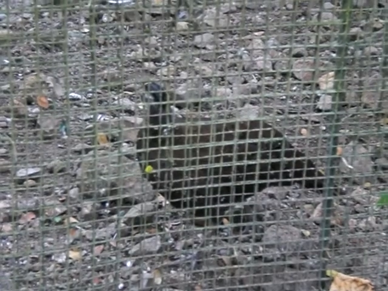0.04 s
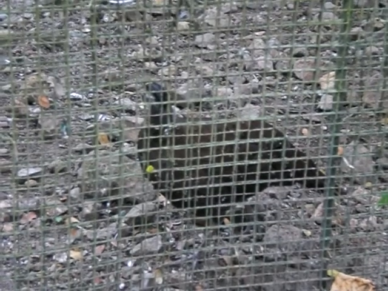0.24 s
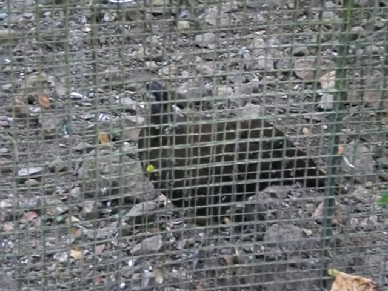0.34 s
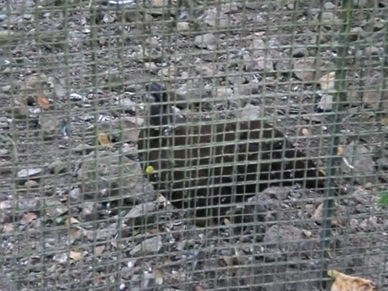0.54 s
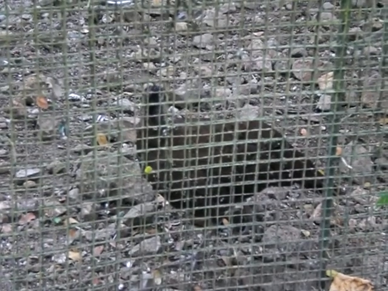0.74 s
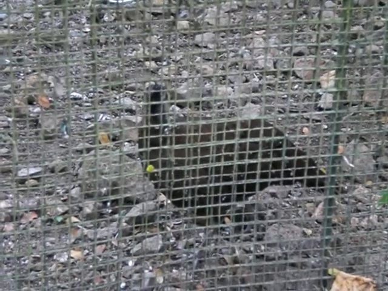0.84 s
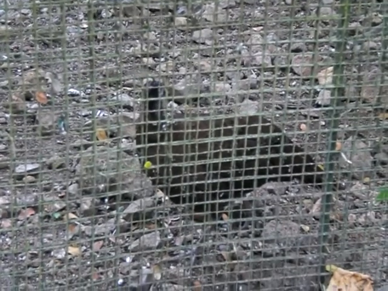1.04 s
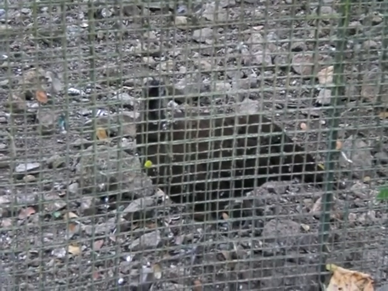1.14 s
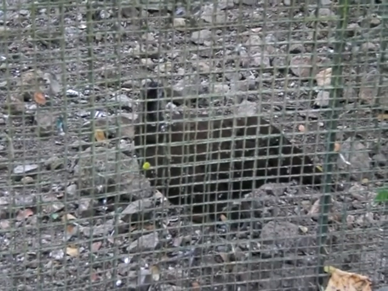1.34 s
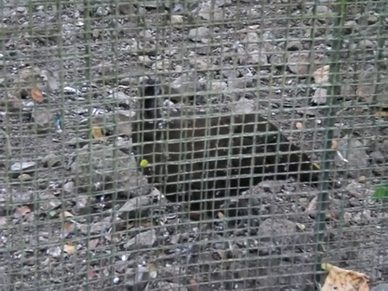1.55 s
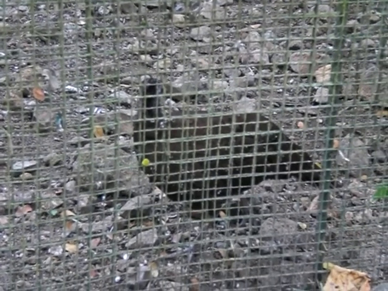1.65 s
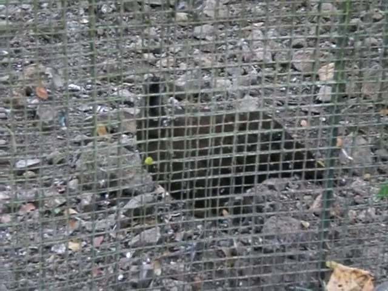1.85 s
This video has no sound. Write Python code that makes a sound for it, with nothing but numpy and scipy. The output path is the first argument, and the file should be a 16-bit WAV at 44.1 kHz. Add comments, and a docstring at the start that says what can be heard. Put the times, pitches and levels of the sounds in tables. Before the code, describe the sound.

One quick, high bird chirp sweeps upward against a faint outdoor rumble and hiss.

```python
"""A wire-mesh outdoor pen in quiet air, where a bird gives one short, bright chirp.
After a faint lead-in whistle, one side of its voice box sweeps up from a low squawk to a whistle;
the other side joins higher, the two beat together, and a small afternote follows.
The ground and the pen return a quick echo and a diffuse tail, and the mesh rings thinly."""
import sys
import numpy as np
from scipy import signal
from scipy.fft import rfft, irfft
from scipy.io import wavfile
from scipy.ndimage import uniform_filter1d

SR = 44100
rng = np.random.default_rng(int(sys.argv[2]) if len(sys.argv) > 2 else 0)


def int16_out(signal):
    """Quantize to a 16-bit WAV file."""
    q = np.round(np.clip(np.atleast_2d(signal).T, -1, 1) * 32767)
    wavfile.write(sys.argv[1], SR, q.astype(np.int16))


N = 83790
T = np.arange(N) / SR
BIN_HZ = np.fft.rfftfreq(N, 1 / SR)


def amp(db):
    """Decibels to gain."""
    return 10 ** (np.asarray(db) / 20)


def unit(x):
    """Scales to unit rms."""
    return x / np.sqrt(np.mean(x ** 2) + 1e-20)


def curve_at(points, hz):
    """Interpolates (Hz, value) points on a log-frequency axis."""
    point_hz, value = np.transpose(points)
    return np.interp(np.log(hz + 1), np.log(point_hz + 1), value)


def noise(bin_gain):
    """Unit-rms noise with the given spectral shape."""
    return unit(irfft(rfft(rng.standard_normal(N)) * bin_gain, N))


def wobble(rate_hz):
    """Smooth, bounded random motion up to about rate_hz."""
    return unit(np.tanh(noise(np.exp(-(BIN_HZ / rate_hz) ** 2))))


# Outdoor air. Each row: frequency in Hz, relative noise density in dB.
AIR_SPECTRUM = [(15, -19), (25, -9), (133, 0), (169, -5), (204, -4.5), (281, -9), (305, -7.5), (349, -11.5),
                (378, -11.5), (495, -12), (537, -12), (848, -13.5), (1620, -19.5), (3170, -26), (8350, -26),
                (10100, -33), (15500, -35)]


def air(rms_db=-48.5, drift_db=1.0):
    """Distant rumble and soft hiss, drifting a little in patches of time and frequency."""
    steady = noise(amp(curve_at(AIR_SPECTRUM, BIN_HZ)))
    spectra = signal.stft(steady, nperseg=1024, noverlap=768)[2]
    patches = uniform_filter1d(rng.standard_normal(spectra.shape[::-1]), size=20, axis=0)
    patches = unit(uniform_filter1d(patches, size=14, axis=1)).T
    drifting = signal.istft(spectra * amp(drift_db * patches), nperseg=1024, noverlap=768)[1]
    return amp(rms_db) * unit(drifting[:N])


# Modes of the wire mesh. Each row: frequency in Hz, relative level in dB, T60 in seconds.
MESH_MODES = [(2499, 1, 0.64), (2600, -4, 0.95), (2600, -7.5, 0.56)]


def mesh_ring(call, rms_db=-57):
    """The call sets close modes of the mesh ringing; they beat as they fade."""
    ring = 0
    for hz, db, t60_s in MESH_MODES:
        mode = amp(-60 * T / t60_s) * np.sin(2 * np.pi * hz * T)
        ring += amp(db) * unit(signal.fftconvolve(call, mode)[:N])
    return amp(rms_db) * unit(ring)


# Reverberation of the pen. Each row: frequency in Hz, gain in dB, T60 in seconds.
PEN_BANDS = [(700, -49, .4), (1500, -20, 0.52), (2220, -14, 0.98), (2700, -2, 1), (2900, -12, 0.91),
             (3320, -16, 0.39), (3850, -8.5, 0.81), (4440, -19, 0.32), (5000, -9, 0.29), (6400, -16, 0.6),
             (8640, -7, 0.35), (15000, -34, .3)]


def pen_tail(call, build_s=0.012):
    """A diffuse tail that builds quickly, each band with its own strength and decay."""
    hz, time_s, spectra = signal.stft(rng.standard_normal(SR), SR, nperseg=512)
    bands = np.array(PEN_BANDS)
    gain_db = curve_at(bands[:, [0, 1]], hz)[:, None]
    t60_s = curve_at(bands[:, [0, 2]], hz)[:, None]
    energy_norm = np.sqrt(2 * np.log(1000) / (t60_s * SR))
    decay = amp(gain_db - 60 * time_s / t60_s) * energy_norm
    tail = signal.istft(spectra * decay, SR, nperseg=512)[1][:SR]
    build_up = 1 - np.exp(-T[:SR] / build_s)
    return signal.fftconvolve(call, tail * build_up)[:N]


# Near reflections off ground and pen. Each row: delay in seconds, gain in dB.
REFLECTIONS = [(.0045, -8.5), (.0083, -4)]


def echoes(call, scatter_hz=3000):
    """Two quick reflections, dulled because the stony ground scatters the treble."""
    dull = signal.lfilter(*signal.butter(1, scatter_hz, fs=SR), call)
    return sum(amp(db) * np.interp(T - delay_s, T, dull, left=0) for delay_s, db in REFLECTIONS)


# Air rasp in the voice box. Each row: frequency in Hz, relative noise density in dB.
RASP_SPECTRUM = [(600, -16), (1300, 9), (3000, -8), (6000, 4), (8000, -7.5), (11000, -3.5), (15500, -7)]


def rasp(effort, pitch_hz, gain_db=-32, full_above_hz=1480):
    """Air rushing through the voice box: follows the effort, weaker at low pitch."""
    flow = effort ** 0.57 * np.minimum(pitch_hz / full_above_hz, 1) ** 2
    return amp(gain_db) * flow * noise(amp(curve_at(RASP_SPECTRUM, BIN_HZ)))


# Membrane harmonics, first to fifth. Each entry: gain in dB.
MEMBRANE_HARMONICS_DB = [1, -8, -13.5, -35, -20]
# Response of throat and beak. Each row: frequency in Hz, gain in dB.
THROAT_RESPONSE = [(700, -6), (1000, -19.5), (1450, -1), (2050, -2), (2600, 2.5), (3250, 0.5), (4300, -2),
                   (5200, -16), (6500, -7.5), (7400, -18), (8700, -12), (10000, -24.5), (15000, -40)]


def throat_tone(pitch_hz, phase, strength):
    """A membrane's harmonics, coloured by throat and beak."""
    tone = 0
    for k, db in enumerate(MEMBRANE_HARMONICS_DB, 1):
        hz = k * pitch_hz
        tone += amp(curve_at(THROAT_RESPONSE, hz) + db) * (hz < SR / 2) * np.sin(k * phase)
    return strength * tone


def membrane(contour, jitter=0.069, shimmer=0.37, wobble_hz=880, ramp_s=0.001):
    """One vibrating side of the voice box; pitch and strength are unsteady where it is rough."""
    time_s, hz, db, roughness = np.transpose(contour)
    roughness = np.interp(T, time_s, np.clip(roughness, 0, 1))
    pitch_hz = np.interp(T, time_s, hz) * np.exp(jitter * roughness * wobble(wobble_hz))
    phase = 2 * np.pi * np.cumsum(pitch_hz) / SR
    gate = np.clip(np.minimum(T - time_s[0], time_s[-1] - T) / ramp_s + 1, 0, 1)
    flutter = np.exp(shimmer * roughness * wobble(wobble_hz))
    strength = gate * amp(np.interp(T, time_s, db)) * flutter
    return pitch_hz, phase, strength


# Contours of the chirp's four notes.
# Each row: time in seconds, pitch in Hz, level before the throat in dB, roughness (capped at 1).
LEAD_IN_CONTOUR = [(.182, 3220, -56, 0.14), (.193, 3280, -48.5, 0.13), (.210, 3260, -50, 0.14),
                   (.224, 3170, -50, 0.1)]
LOW_CONTOUR = [(.2145, 736, -41, 0.08), (.218, 766, -29, 0.2), (.2225, 801, -36.5, 0.25),
               (.2245, 970, -17, 0.54), (.228, 1065, -20.5, .4), (.2305, 1349, -24, 0.55),
               (.2338, 1499, -21, 0.4), (.2348, 2418, -21, 0.5), (.2372, 2564, -23.5, 0.51),
               (.240, 3172, -24, 0.04), (.2505, 3213, -19, 0.07), (.2528, 3180, -17, 0),
               (.2552, 3270, -9.5, 0.14), (.2572, 3346, -29.5, 0.3), (.261, 3447, -20.5, 0.31),
               (.268, 3422, -27.5, 0.42), (.278, 3467, -26, 0.42), (.287, 3270, -33.5, 0.4),
               (.290, 2620, -40, 1.2), (.294, 1920, -56, 1)]
HIGH_CONTOUR = [(.255, 3993, -54, .2), (.260, 4130, -35.5, 0.2), (.267, 4188, -26.5, 0.16),
                (.275, 4360, -21, 0.03), (.283, 4238, -29, 0.42), (.2875, 4146, -18.5, 0.2),
                (.290, 4173, -21.5, 0.5), (.295, 4410, -24, 0.2), (.298, 4230, -27, 0.6),
                (.302, 3970, -50, .7)]
AFTERNOTE_CONTOUR = [(.311, 4200, -32, 0.51), (.317, 4460, -28, 0.2), (.321, 4320, -28, 0.3),
                     (.325, 3900, -33.5, 0.7), (.329, 3600, -37, .5)]


def bird(coupling_knee_db=-25, combination_db=-6):
    """Both sides of the voice box sound and couple into a third tone, between two soft notes."""
    low_hz, low_phase, low_strength = membrane(LOW_CONTOUR)
    high_hz, high_phase, high_strength = membrane(HIGH_CONTOUR)
    low = throat_tone(low_hz, low_phase, low_strength)
    high = throat_tone(high_hz, high_phase, high_strength)
    coupling = np.tanh(low_strength / amp(coupling_knee_db))
    combination = amp(combination_db) * coupling * high_strength * np.sin(2 * high_phase - low_phase)
    breath = rasp(low_strength + high_strength, low_hz)
    afternote = throat_tone(*membrane(AFTERNOTE_CONTOUR))
    lead_in = throat_tone(*membrane(LEAD_IN_CONTOUR))
    return lead_in + low + high + combination + breath + afternote


def scene():
    """The chirp, its echoes and tail, the mesh ring and the air, in mono."""
    call = bird()
    return (call + echoes(call) + pen_tail(call) + mesh_ring(call) + air())[None]


def record(dry):
    """Steep low-pass at the top of the treble."""
    cutoff_hz = 15750
    lowpass = signal.firwin(801, cutoff_hz, window=("kaiser", 9), fs=SR)
    return signal.oaconvolve(dry, lowpass[None], "same")


dry = scene()
out = record(dry)
int16_out(out)
```